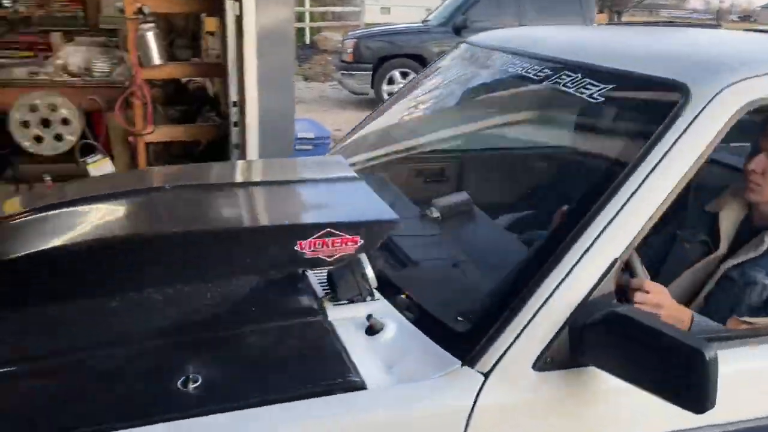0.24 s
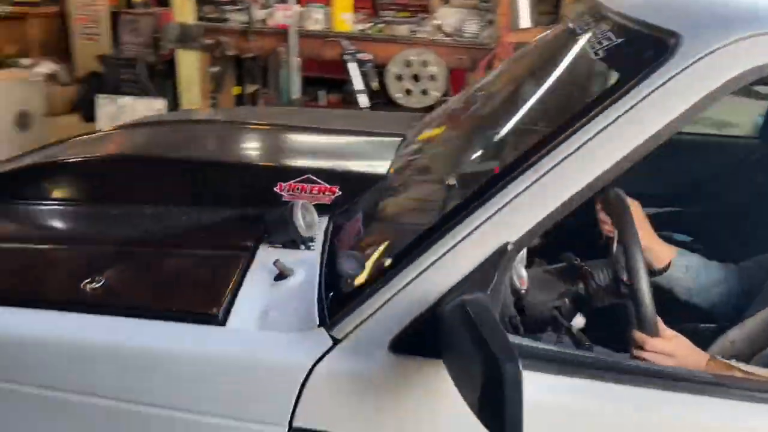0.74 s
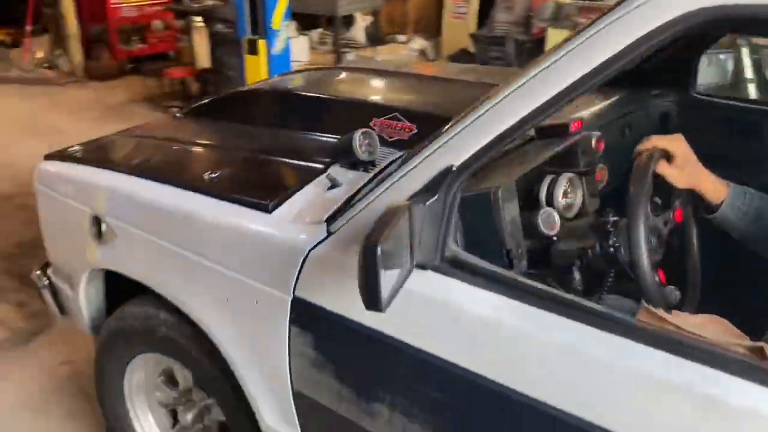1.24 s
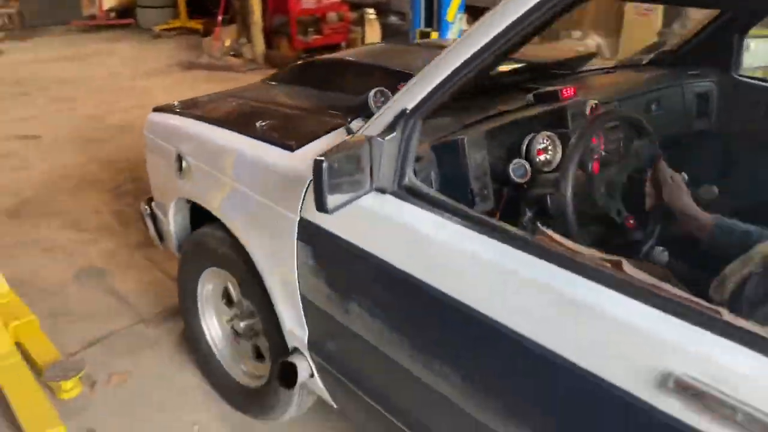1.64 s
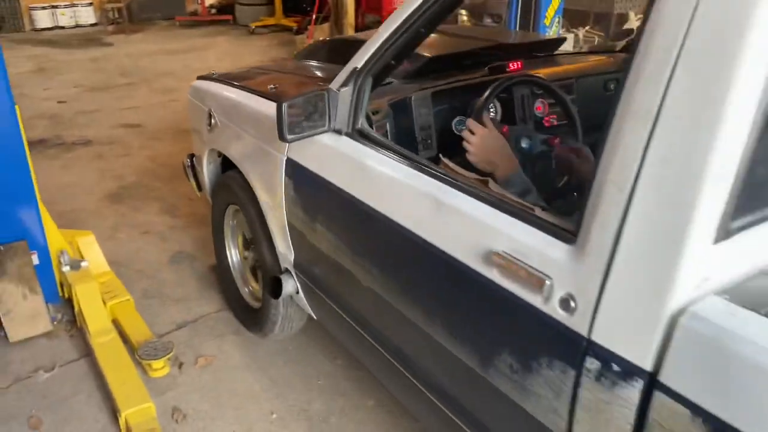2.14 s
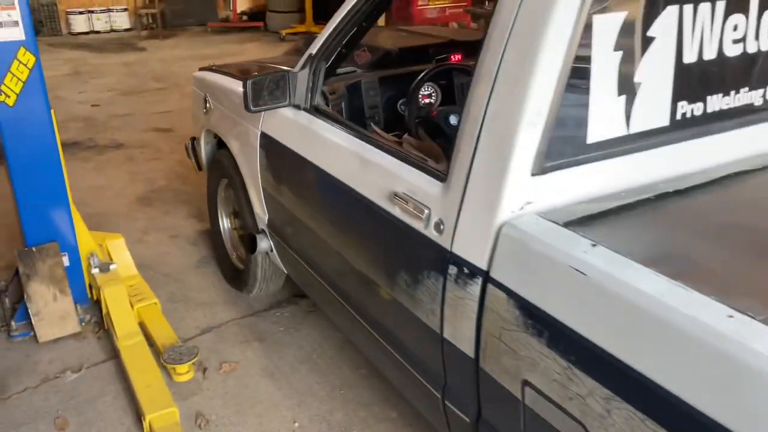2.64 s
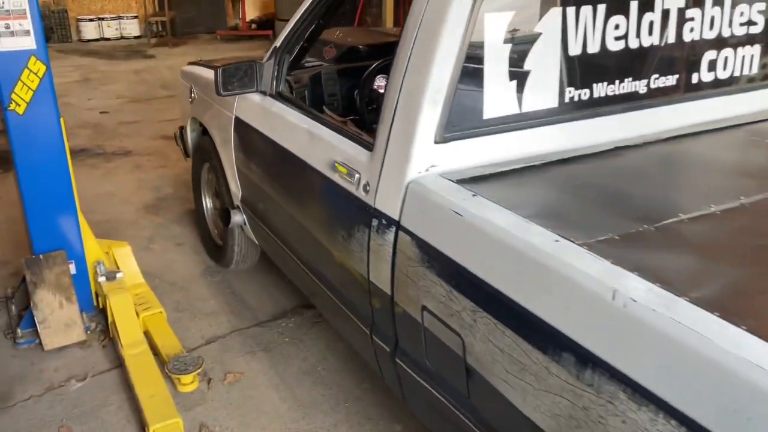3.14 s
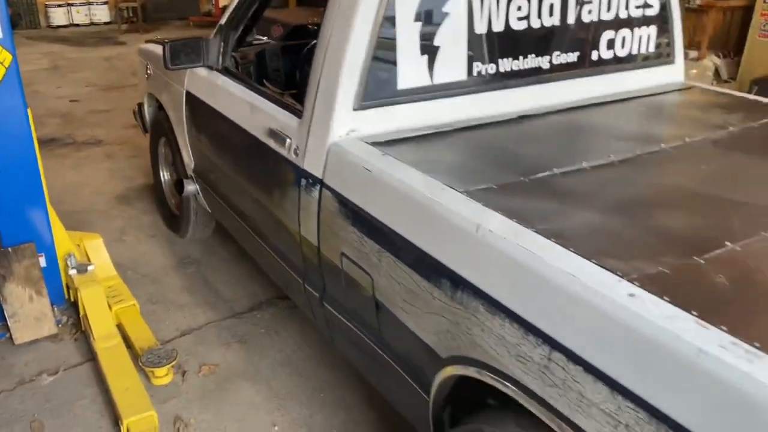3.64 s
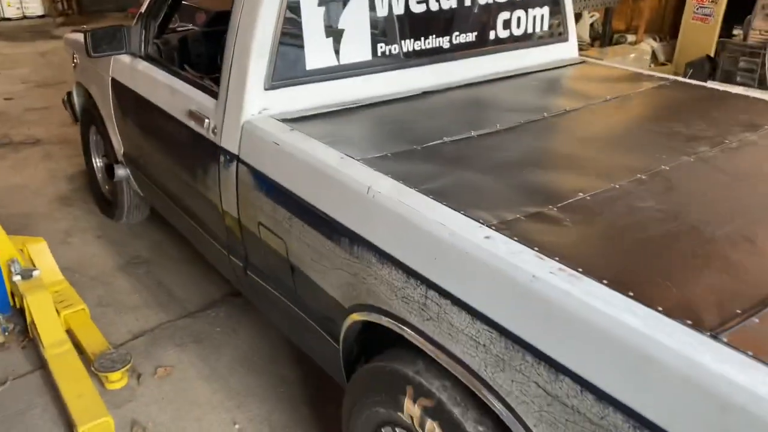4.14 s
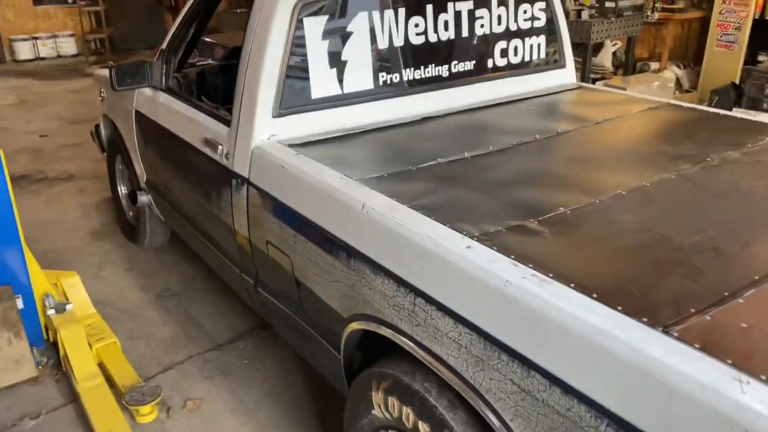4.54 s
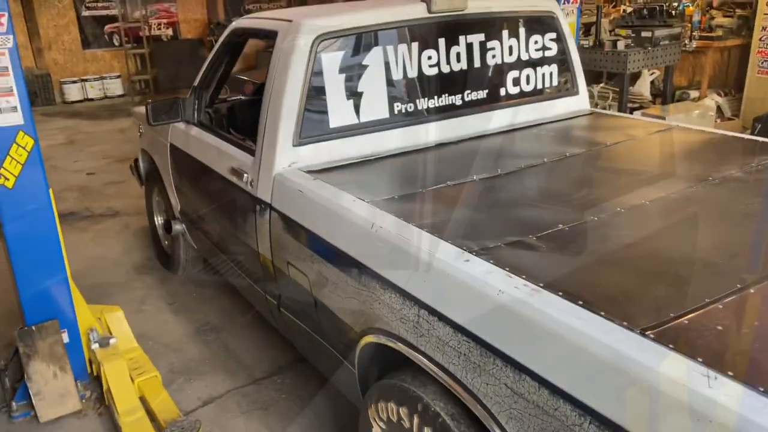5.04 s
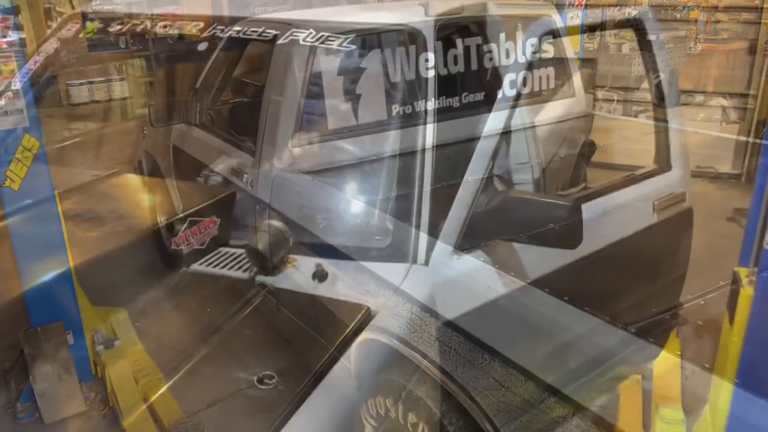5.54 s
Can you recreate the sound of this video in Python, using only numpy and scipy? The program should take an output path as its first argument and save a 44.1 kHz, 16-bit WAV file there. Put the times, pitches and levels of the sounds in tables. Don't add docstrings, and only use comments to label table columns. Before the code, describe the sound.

Close, raw idle of a tuned truck engine, about forty irregular firings a second with a loping stumble. It begins bright and barking beside the exhaust mouth, then turns boomier and more distant behind the cab and bed. Mechanical ticking, crackling puffs and brief squeaks fill the gaps; short garage reflections surround it before a final fade.

```python
import sys
import numpy as np
from scipy import signal
from scipy.fft import rfft, irfft, next_fast_len
from scipy.io import wavfile
from scipy.ndimage import uniform_filter1d

SR = 44100
rng = np.random.default_rng(int(sys.argv[2]) if len(sys.argv) > 2 else 0)


def linear_from_db(decibels):
    return 10 ** (np.asarray(decibels, float) / 20)


def digitize_waveform(pressure):
    field = np.atleast_2d(pressure).T
    bounded = np.clip(field, -1, 1)
    quanta = np.round(bounded * 32767).astype(np.int16)
    wavfile.write(sys.argv[1], SR, quanta)


N = 254898
T = np.arange(N) / SR

# [t/s, share 0-1]
BEHIND = [(0, 0.08), (2.2, 0.7), (4.3, 0.91), (5.78, 0.99)]


def over_time(points):
    return np.interp(T, *np.transpose(points))


def bump(at_s, wide_s):
    return np.exp(-((T - at_s) / wide_s) ** 2)


def evened(x):
    return x / np.sqrt(np.mean(x ** 2) + 1e-20)


def read(points, hz):
    f, value = np.transpose(points)
    return np.interp(np.log(hz + 1), np.log(f + 1), value)


def colour(x, points, lead=None):
    size = next_fast_len(N + 4096)
    hz = np.fft.rfftfreq(size, 1 / SR)
    turn = 0 if lead is None else np.interp(hz, *np.transpose(lead))
    spectrum = rfft(x, size) * linear_from_db(read(points, hz)) * np.exp(1j * turn)
    return irfft(spectrum, size)[..., :N]


def ring(x, hz, t60):
    turn = np.exp(2j * np.pi * np.cumsum(hz * np.ones(N)) / SR)
    r = np.exp(-np.log(1000) / t60 / SR)
    return (turn * signal.lfilter([1], [1, -r], x / turn)).imag


def heard(layer):
    # [level at 1 m off the beam/dB, share of the distance loss,
    # gain in the beam/dB, gain behind the cab/dB]
    layers = [
        (-12, 0.87, 2, 1.55),
        (-27.5, 0.56, 12.5, -2.5),
        (-30.5, 0.22, 13, 7),
        (-37, 0.34, 6.5, -1.13),
        (-13, 2.16, 12, -1),
        (-28.5, 0.51, -5, -1.3),
    ]
    # [t/s, distance to the near pipe/m]
    distance = [(0, 1.4), (1.0, 1.2), (1.9, 1.22), (2.7, 1.68), (3.1, 1.46), (3.9, 2.93), (4.4, 3.18),
                (5.0, 4.2), (5.78, 6.36)]
    # [t/s, share 0-1]
    aim = [(0, 1.01), (.5, 0.79), (1.05, 0.55), (1.3, 0.34), (1.6, 0.29), (1.95, 0.17), (2.4, 0.2)]
    row = ["thump", "bark", "growl", "puff", "beam", "far pipe"].index(layer)
    db, share, aim_db, behind_db = layers[row]
    loss_db = -20 * np.log10(over_time(distance))
    return linear_from_db(db + share * loss_db + aim_db * over_time(aim) + behind_db * over_time(BEHIND))


def firings(column, spread_db, jitter_ms, odd=0, run_in=0):
    # [place/sixteenths of the cycle, far pipe/dB, bark/dB, growl/dB, puff/dB]
    cylinders = [(3.655, -3, 1, 1, 7), (5.6, -2, -9, -5, 7), (6.694, -4, -13, -10, 1),
                 (8.65, -8, -1, -2, 10.5), (11.65, -4, 3, -4, 7.5), (13.635, -1, -3, -4, 5),
                 (14.68, 5, -7, -3, 9), (16.12, -20, -12, -16, -12)]
    # [beside the pipe/dB, behind the bed/dB]
    push = [(-3.4, -2), (-6.6, -9.2), (-.3, -1.8), (-3.3, -3.6), (-4.6, -2.5), (-7.1, -6.3), (.5, -2),
            (-12.3, -8)]
    # [t/s, lag of the crank/ms]
    lag = [(.3, -4.4), (.95, 2.8), (1.23, -.2), (1.5, .3), (1.78, -2.7), (2.3, 2.1), (2.53, 2), (2.71, -.5),
           (3.08, 4.5), (3.83, 1.3), (4.2, -2.7), (4.85, -6.7), (5.31, -3.5), (5.5, -5.9)]
    # [t/s, overtones/dB, puff/dB]
    odd_ones = [(0.078, 10, 5.5), (0.263, -21, 0), (0.356, -7, 3.8), (0.436, 8, -0.9), (0.449, -11, -6),
                (0.507, -7, 4), (0.635, -5, 9.5), (0.692, 5, 6.5), (0.785, 0, 1), (0.82, -8, -15),
                (0.878, 9, 1), (0.994, 10, 1), (1.179, 2, -4), (1.192, 11, 3), (1.285, 3, -6.5),
                (1.378, 3, -4.7), (1.47, 1, 1), (1.551, -6, 2.5), (1.586, 2, -2.5), (1.749, -19, 0),
                (1.807, 4, 1.5), (1.842, -8, -0.8), (1.935, 8, 7), (1.992, -4, 3.4), (2.085, 0, -2),
                (2.178, -8, -10), (2.364, 4, -2), (2.399, 10, -5), (2.479, 10, 0), (2.492, 11, -13),
                (2.549, -15, 3), (2.851, -12, 1.3), (2.886, 7.5, 2.5), (2.921, 4, 1), (3.014, 7.5, -3),
                (3.235, 9, 8), (3.257, -2, -3), (3.292, -3, -8), (3.571, 6.5, -0.5), (3.606, 2, 7),
                (3.779, -12, -0.5), (3.872, -14, 3), (3.965, -9, 1), (4.0, -9, 2.5), (4.035, -10, 2),
                (4.07, 6.5, 2), (4.221, -15, -1.5), (4.522, -11, -3), (4.557, 4, 1), (4.592, 9, 2.7),
                (4.708, 8, 4.5), (4.893, -3.7, 2.5), (5.079, 0.9, -3.2), (5.172, 3.2, 2), (5.277, -11, -4),
                (5.335, 10, -3), (5.486, 1, 0), (5.556, -17, 0)]
    cycles_per_s = 5.385
    table = np.array(cylinders)
    s = (np.arange(-1, 32)[:, None] + table[:, 0] / 16) / cycles_per_s
    chance = np.clip(rng.standard_normal(s.shape + (2,)), -2, 2)
    if column:
        habit_db = table[:, column]
    else:
        near_db, rear_db = np.transpose(push)
        habit_db = near_db + np.interp(s, *np.transpose(BEHIND)) * (rear_db - near_db)
    extra_db = spread_db * chance[..., 1]
    if odd:
        for row in odd_ones:
            extra_db.flat[abs(s - row[0]).argmin()] = row[odd]
    late_ms = np.interp(s, *np.transpose(lag)) + jitter_ms * chance[..., 0]
    s = s + late_ms / 1000 + run_in / SR
    ok = (s > 0) & (s < T[-1] + run_in / SR)
    out = np.zeros(N + run_in)
    out[(s[ok] * SR).astype(int)] = linear_from_db(habit_db + extra_db)[ok]
    return out


def burst(clicks, rise_ms, fall_ms):
    t_ms = np.arange(4096) / SR * 1000
    shape = np.exp(-t_ms / fall_ms) * (1 - np.exp(-t_ms / rise_ms))
    return signal.oaconvolve(clicks, shape)[:N]


def thump():
    # [f/Hz, t60/s, beside the pipe/dB, behind the bed/dB, travel/ms]
    boom = [(58.2, .035, 2.5, -8.6, .1), (93.2, .032, -28, 3.3, 8.3), (125.5, .147, 5.4, 1.8, 6.6),
            (145, .189, -2.8, .7, 15.7), (185.7, .031, -4.9, -17.3, .9), (205.5, .33, -30, -5.4, 3.6),
            (253, .03, -23, -5.5, 12.8)]
    run_in = 8000
    early = round(1.15 * SR / 1000)
    clicks = firings(column=0, spread_db=.7, jitter_ms=.15, run_in=run_in)
    behind, t, modes = over_time(BEHIND), T[:SR // 2], 0
    for hz, t60, near_db, rear_db, travel_ms in boom:
        once = linear_from_db(-60 * t / t60) * np.sin(2 * np.pi * hz * t)
        twice = signal.fftconvolve(once, once)[:len(t)]
        twice = np.pad(twice, (round(travel_ms * SR / 1000), 0))
        rung = signal.fftconvolve(clicks, twice / np.linalg.norm(twice))[run_in + early:][:N]
        modes = modes + linear_from_db(near_db + behind * (rear_db - near_db)) * rung
    doorway = linear_from_db(-1.5 * bump(0.6, 0.17))
    return heard("thump") * doorway * evened(modes)


def overtones(modes, fall_ms, column, sign=-1, odd=1):
    clicks = firings(column=column, spread_db=1, jitter_ms=0.24, odd=odd)
    gas = burst(clicks, rise_ms=.5, fall_ms=fall_ms) * rng.standard_normal(N)
    share = np.clip(.22 + .1 * over_time(BEHIND), 0, 1)
    drive = (1 - share) * evened(clicks) + share * evened(gas)
    out = 0
    for k, (hz, t60, db) in enumerate(modes):
        out = out + sign ** k * linear_from_db(db) * ring(drive, hz, t60)
    return drive, out


def bark():
    # [f/Hz, t60/s, level/dB]
    low_modes = [(268.7, .06, -3), (356, .07, -2), (436, .075, 1.5)]
    modes = overtones(low_modes, fall_ms=15, column=2, sign=1, odd=0)[1]
    return heard("bark") * evened(modes)


def growl():
    # [f/Hz, t60/s, level/dB]
    high_modes = [(898, 0.088, 1.5), (1048, 0.056, 6), (1404, 0.03, -4), (1710, 0.018, -4)]
    # [t/s, start f/Hz, slide/(Hz/s), level/dB, hold/s]
    spells = [
        (1.15, 1060, 150, 6, .68),
        (4.6, 1014, 12, 0, .55),
    ]
    rise_db_per_s, fall_db_per_s, rest_db = 152, 45, -16
    drive, modes = overtones(high_modes, fall_ms=8, column=3)
    out = evened(modes)
    for s, hz, slide_hz, db, hold_s in spells:
        since = T - s
        edges_db = rise_db_per_s * np.minimum(since, 0) - fall_db_per_s * np.maximum(since - hold_s, 0)
        peak = ring(drive, hz + slide_hz * np.clip(since, -1, 1), t60=.024)
        out = out + linear_from_db(np.maximum(db + edges_db, rest_db)) * evened(peak)
    return heard("growl") * linear_from_db(-8.5) * out


def far_pipe():
    # [f/Hz, t60/s, level/dB]
    far_modes = [(590, .075, 0), (747, .075, 0)]
    modes = overtones(far_modes, fall_ms=7, column=1, odd=0)[1]
    under_cab_db = 4 * bump(1.96, 0.11)
    bed_db = -11.5 * np.maximum(T - 3.87, 0)
    view_db = -5 * bump(1.25, 0.29) + under_cab_db + bed_db
    return heard("far pipe") * linear_from_db(view_db) * evened(modes)


def puffs():
    # [f/Hz, level/dB]
    gas_colour = [(300, -35), (900, 3), (2000, -6), (4000, -22), (5500, -17.5), (6800, -12), (8700, -1),
                  (11000, -10), (14000, -12), (16000, -22)]
    # [f/Hz, level/dB]
    mouth = [(1500, -63), (2600, 7), (3600, 11), (4600, 6), (6000, -6)]
    # [f/Hz, level/dB]
    whine_colour = [(4600, -40), (5500, -6), (6100, 9), (6700, -6.5), (7600, -24)]
    # [t/s, level/dB]
    whine_db = [(0, -45), (1.2, -23), (2.1, -17.5), (2.8, -23), (4.0, -22.5), (4.7, -29.5), (5.78, -25.5)]
    clicks = firings(column=4, spread_db=1, jitter_ms=.4, odd=2)
    gate = burst(clicks, rise_ms=1.1, fall_ms=8.5)
    crackle = linear_from_db(1.72 * evened(uniform_filter1d(rng.standard_normal(N), size=60)))
    z = signal.stft(gate * crackle * rng.standard_normal((2, N)), nperseg=128)[2]
    patches = uniform_filter1d(rng.standard_normal(z.shape[1:]), size=4, axis=0)
    patches = evened(uniform_filter1d(patches, size=5, axis=1))
    gas = signal.istft(z * linear_from_db(2.8 * patches), nperseg=128)[1][:, :N]
    whine = linear_from_db(over_time(whine_db)) * evened(colour(gas, whine_colour))
    beam = heard("beam") * evened(colour(gas, mouth))
    return heard("puff") * linear_from_db(7.5) * (evened(colour(gas, gas_colour)) + beam + whine)


def whistles():
    clicks = firings(column=4, spread_db=3, jitter_ms=5)
    at = np.flatnonzero(clicks)
    hz = np.geomspace(1300, 2800, 200)[rng.integers(0, 200, len(at))]
    latest = np.maximum(np.searchsorted(at, np.arange(N), "right") - 1, 0)
    held = hz[latest]
    squeak = ring(ring(clicks, held, .03), held, .03)
    return heard("puff") * linear_from_db(-12) * evened(squeak)


def chirps():
    # [t/s, peak level/dB, f/Hz]
    squeaks = [(1.843, -28, 4310), (2.404, -33, 4340), (3.52, -29.5, 4650), (4.259, -31, 4600)]
    out, t = np.zeros(N), np.arange(2000) / SR
    for s, db, hz in squeaks:
        wobble = evened(uniform_filter1d(rng.standard_normal(len(t)), size=80))
        turn = 2 * np.pi * np.cumsum(hz * (1 + .025 * wobble)) / SR
        swell = t / .004 * np.exp(1 - t / .004)
        out[round(s * SR):][:len(t)] += linear_from_db(db - 1.5) * swell * (np.sin(turn) + .7 * np.sin(.54 * turn))
    return out


def rattle():
    # [f/Hz, level/dB]
    block_colour = [(45, 9), (100, 9), (160, 4), (260, 0), (500, -12), (1000, -6), (1800, -17), (3000, -32),
                    (6000, -47.5)]
    # [f/Hz, level/dB]
    valve_colour = [(800, -0.5), (2000, -2), (3500, 0.5), (5500, -5.5), (8500, -3.5), (12000, -5.5),
                    (16000, -8.5)]
    behind = over_time(BEHIND)
    strength = linear_from_db(5.2 * np.minimum(rng.exponential(1, N), 4))
    ticks = strength * (rng.random(N) < 2500 / SR) * rng.standard_normal(N)
    wash = evened(ticks) * 0.35 + rng.standard_normal((2, N))
    block = heard("growl") * linear_from_db(-2.5 + 4.5 * behind) * evened(colour(wash, block_colour))
    valves = heard("puff") * linear_from_db(-0.14 + 1.08 * behind) * evened(colour(wash, valve_colour))
    return block + valves


def echoes():
    # [f/Hz, t60/s]
    ring_times = [(60, 0.72), (500, 0.14), (2000, 0.059), (8000, 0.084), (16000, 0.24)]
    taps = np.zeros((2, SR // 2))
    slots = np.arange(130, SR // 2 - 20, 20)
    at = slots + rng.integers(0, 20, (2, len(slots)))
    np.put_along_axis(taps, at, rng.choice([-1., 1.], at.shape), 1)
    hz, t, z = signal.stft(taps, SR, nperseg=256)
    decay = linear_from_db(-60 * t / read(ring_times, hz)[:, None])
    tail = signal.istft(z * decay / np.linalg.norm(decay, axis=1)[:, None], SR, nperseg=256)[1]
    return tail / np.linalg.norm(tail[0])


def garage(x):
    # [f/Hz, level/dB]
    wet_colour = [(60, -36), (150, -30), (300, -11), (800, -4.5), (2000, -2.5), (5000, -5), (7000, -3),
                  (8000, -13), (9200, -15), (11500, -9), (13000, -22), (16000, -32)]
    wet = colour(x, wet_colour) * linear_from_db(0.5 + 2 * over_time(BEHIND))
    out = 0
    for k in range(3):
        turn = np.sqrt(2 / 3) * np.cos(np.pi * (T * 2.7 + k / 3))
        out = out + signal.fftconvolve((wet * turn)[None], echoes(), axes=1)[:, :N]
    return out


def scene():
    # [t/s, level/dB]
    lulls = [(.578, -14), (.772, -10), (.962, -6), (1.14, -2), (1.33, -3), (1.703, -5), (1.879, -3),
             (2.072, -5), (2.81, -5), (3.0, -4), (3.379, -4), (4.287, -4), (5.227, -7), (5.596, -4)]
    # [f/Hz, level/dB]
    tilt = [(30, 1.8), (70, .3), (140, -.2), (330, 1.5), (800, 5.5), (1500, 8), (2600, 4), (4500, 7),
            (6500, 6), (7800, 0), (16000, 0)]
    # [f/Hz, phase/rad]
    lead = [(0, 0), (400, .2), (2900, 1), (4800, .6), (5600, -1), (6800, -1.6), (7300, -2.3), (8000, -3),
            (9200, -3.3), (10200, -4.3), (11700, -5.3), (12900, -6.28), (22050, -6.28)]
    # [f/Hz, level/dB]
    loose_colour = [(100, -9.5), (400, -2), (1500, -6), (2500, -6), (4500, -6), (6500, -9), (8600, -40),
                    (10500, -22), (12300, -7), (13000, -33)]
    hiss, loose = puffs() + rattle()
    lull = linear_from_db(sum(db * bump(s, .016) for s, db in lulls))
    engine = lull * (thump() + bark() + growl()) + far_pipe() + whistles() + chirps() + hiss
    ports = []
    for side in (1, -1):
        half_tilt = [(hz, side * db / 2) for hz, db in tilt]
        half_lead = [(hz, side * rad / 2) for hz, rad in lead]
        ports.append(colour(engine, half_tilt, half_lead))
    unalike = colour(loose, loose_colour) * [[1], [-1]]
    return np.array(ports) + unalike + garage(engine) * linear_from_db([[1], [-1]])


def band_limit(x):
    return signal.sosfilt(signal.butter(12, 15880, fs=SR, output="sos"), x)


def record(dry):
    fade_start_s, fade_end_s = 5.03, 5.92
    fade = np.clip((fade_end_s - T) / (fade_end_s - fade_start_s), 0, 1)
    low_cut = signal.butter(4, 45, "high", fs=SR, output="sos")
    held = 1.05 * np.tanh(signal.sosfilt(low_cut, dry * fade) / 1.05)
    treble_limit = signal.firwin(511, 15880, window=("kaiser", 9), fs=SR)
    mix = signal.oaconvolve(held, treble_limit[None], "same")
    return band_limit(mix)


dry = scene()
out = record(dry)
digitize_waveform(out)
```